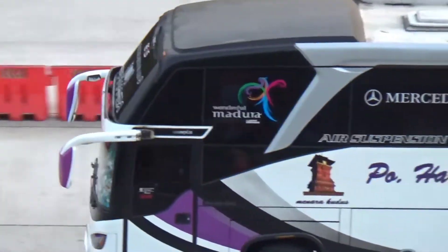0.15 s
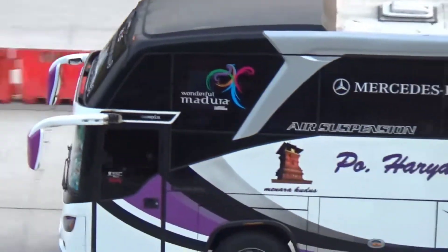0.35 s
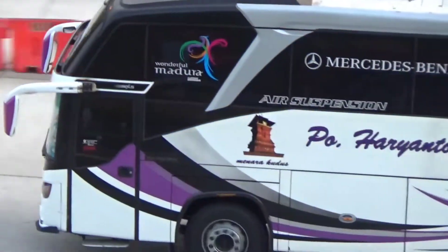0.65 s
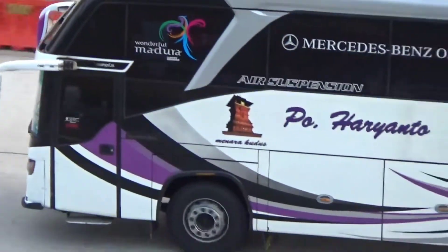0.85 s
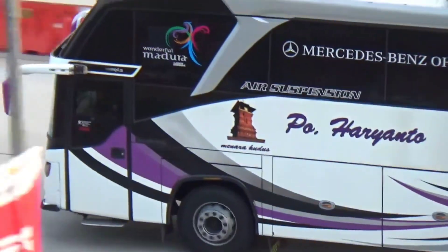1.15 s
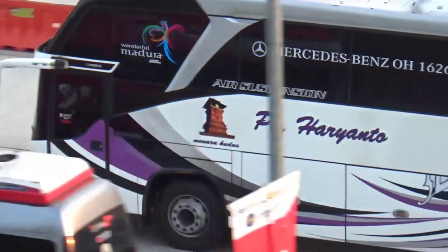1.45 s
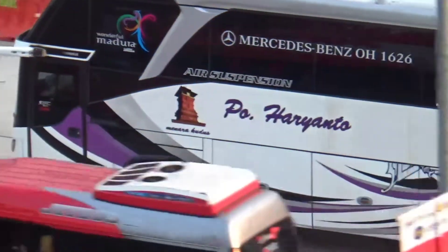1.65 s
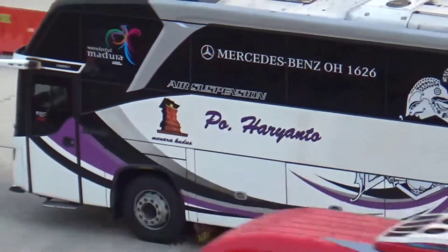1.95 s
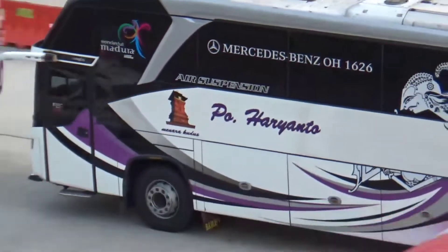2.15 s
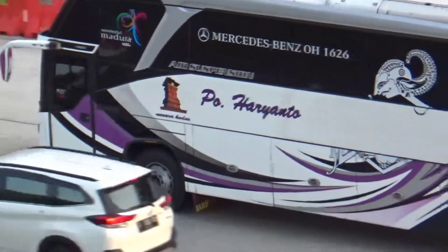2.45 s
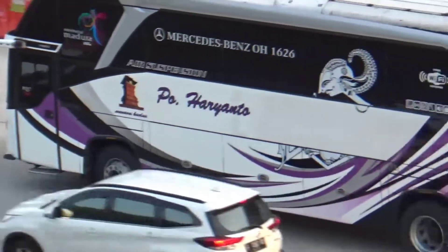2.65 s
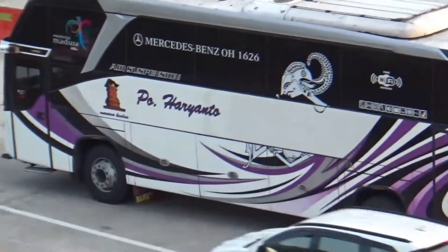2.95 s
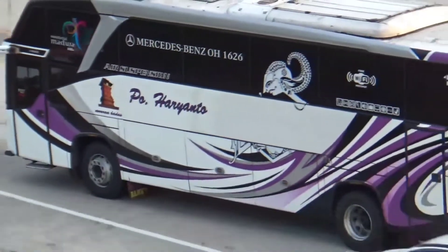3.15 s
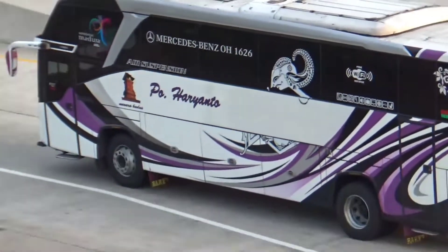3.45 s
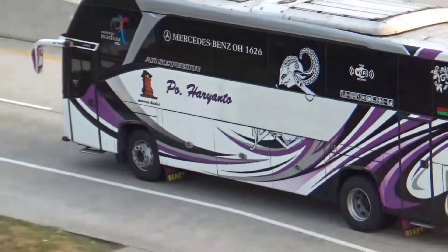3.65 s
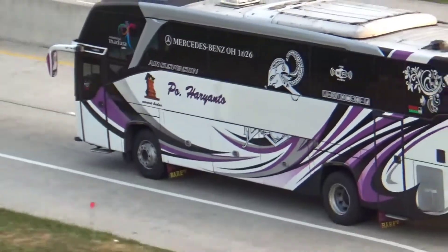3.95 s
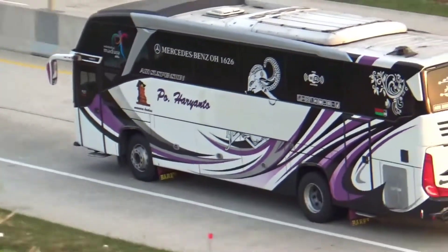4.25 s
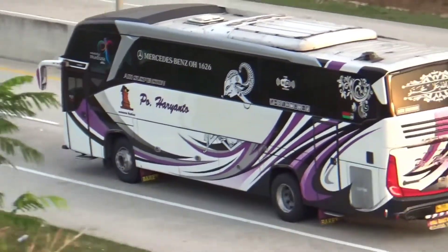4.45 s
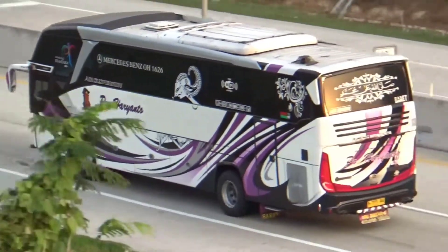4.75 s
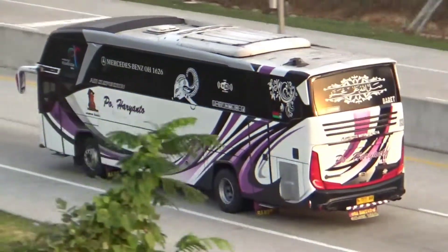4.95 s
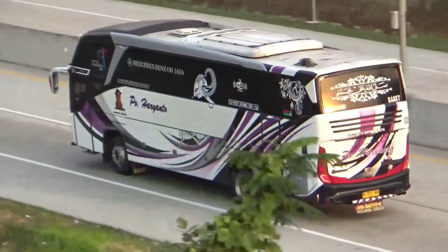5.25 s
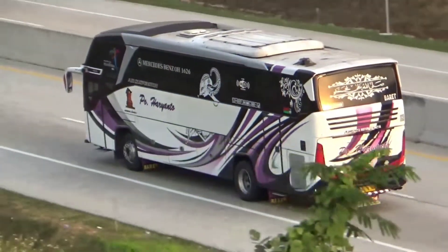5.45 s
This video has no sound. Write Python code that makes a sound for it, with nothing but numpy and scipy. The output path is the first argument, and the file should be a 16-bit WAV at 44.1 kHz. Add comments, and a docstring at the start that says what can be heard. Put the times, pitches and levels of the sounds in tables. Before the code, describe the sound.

From a raised spot beside a highway, steady traffic noise surrounds a passing coach. A hollow tyre howl and fluttering hiss build first, the hiss ducking for a moment as a car blocks the sound. As the coach moves away, its tyres whine and whistle and its rear engine adds a rushing noise. A faraway engine rises softly in pitch while the low rumble eases.

```python
"""A coach passing on a concrete highway

Heard from above the roadside through a close pair of microphones, the tyres howl and whine in the air
resonances of their tread and hiss with an echo off the road. The rush of the rear engine bay opens up
as the tail comes into view. Traffic rumbles around the coach, and a distant engine speeds up."""
import sys
import numpy as np
from scipy.fft import rfft, irfft
from scipy.io import wavfile
from scipy.ndimage import uniform_filter1d, minimum_filter1d, map_coordinates

SR = 44100
rng = np.random.default_rng(int(sys.argv[2]) if len(sys.argv) > 2 else 0)


def file_out(sig):
    """Save sig as 16-bit WAV at sys.argv[1]."""
    # one column per channel
    cols = np.atleast_2d(sig).T
    # limit, then scale
    lim = np.clip(cols, -1, 1)
    pcm = np.round(lim * 32767).astype(np.int16)
    wavfile.write(sys.argv[1], SR, pcm)


N = 246519
FFT_SIZE = 2 ** 18

# Air resonances of the tread: (frequency [Hz], bandwidth [Hz], relative level [dB])
HOWL_MODES = [(978.5, 122, 1), (1087, 200, -6), (1236, 130, -13)]
WHINE_MODES = [(1679, 163, -8), (1823, 203, 0), (2013, 267, -4.5)]
WHISTLE_MODES = [(2857, 360, -0.5), (3138, 690, -7.5)]
HORN_MODES = [(2634, 490, 0)]  # beamed fore and aft by the wedge between tyre and road
REARWARD_MODES = [(3690, 770, 9), (4290, 450, 5), (5090, 300, -12)]
SIZZLE_MODES = [(9150, 1100, 5.5), (10070, 1000, -4), (10500, 580, -6)]  # the top of the hiss
# Envelopes; the howl leads the approach, the whine the departure: (time [s], relative level [dB])
HOWL_ENVELOPE = [(0, -23.5), (.33, -27.5), (.85, -18), (1.1, -18), (1.26, -14), (1.6, -14.5), (2.0, -13),
                 (2.48, -20.5), (2.75, -19), (3.62, -17.5), (3.8, -25), (4.38, -26.5), (4.55, -23.5),
                 (4.8, -26), (5.59, -23.5)]
WHINE_ENVELOPE = [(0, -31.5), (1.3, -27.5), (1.6, -23.5), (1.71, -17), (1.85, -21.5), (2.35, -20.5),
                  (2.5, -26), (2.72, -22), (2.85, -14), (3.09, -18), (3.16, -15.5), (3.329, -16.5),
                  (3.48, -23.5), (3.8, -13), (4.4, -14), (4.63, -19.5), (4.75, -12), (5.59, -18)]
WHISTLE_ENVELOPE = [(0, -36), (.4, -39), (.8, -28.5), (1.2, -30), (1.8, -24), (2.37, -24), (2.5, -41.5),
                    (2.83, -17.5), (3.0, -23.5), (3.27, -15.5), (3.47, -23.5), (3.65, -18), (4.05, -35.5),
                    (4.62, -21), (5.05, -27.5), (5.4, -23.5), (5.59, -35)]
# Hum of the tread: (time [s], frequency [Hz], level [dB])
TREAD_HUM = [(0, 364, -47), (1.4, 371.6, -40), (2.6, 368.2, -45), (4.0, 331.6, -48), (5.59, 326.4, -61)]
# Surges and sags of the hiss, likely from the concrete's grain: (time [s], half-width [s], gain [dB])
HISS_SURGES = [(0.834, 0.044, 6), (1.19, 0.073, 3.5), (1.378, 0.05, 5), (1.543, 0.078, 3.5),
               (2.067, 0.053, 4.5), (2.852, 0.044, 3.5), (3.306, 0.038, 4), (3.4, .05, -4.5),
               (3.88, 0.16, 2.5), (4.195, 0.06, -2.5), (4.348, 0.029, 4), (5.25, 0.061, -2)]
# Rush of the engine bay before screening: (time [s], level [dB])
RUSH_ENVELOPE = [(0, -47), (1.2, -32), (2.4, -34.5), (2.78, -27), (3.42, -37), (3.72, -21), (3.93, -25),
                 (4.12, -21), (4.7, -30.5), (5.59, -23)]
# Spectra of tyre hiss, traffic rumble and traffic roar: (frequency [Hz], relative level [dB])
HISS_SPECTRUM = [(800, -37), (2300, -4.5), (3000, -9.5), (3800, 2.5), (4700, 0.5), (5500, 2), (6200, -0.5),
                 (6750, 0.5), (7120, 0.5), (7500, 2.5), (8500, 3.5), (9300, 1), (10200, -1.5),
                 (11000, -7.5)]
RUMBLE_SPECTRUM = [(15, -34), (55, -32), (85, -17.5), (130, -17.5), (190, -12.5), (260, -3), (340, 1),
                   (450, 2), (600, -8), (900, -5), (2000, -45)]
ROAR_SPECTRUM = [(200, -33.5), (480, -13), (620, -6.5), (720, 1.5), (900, 3), (1200, 0.5), (1450, -2.5),
                 (1900, -1), (2400, -14.5), (4000, -15.5), (11000, -29.5)]
# Scattering by barriers and vehicles: (frequency [Hz], level relative to the direct sound [dB])
SCATTER_SPECTRUM = [(30, -10), (100, -13), (300, -13.5), (1000, -15.5), (2000, -17), (4000, -13.5),
                    (7000, -11), (10500, -21)]
# Phase at the left microphone relative to the right: (frequency [Hz], phase [rad])
MICROPHONE_PHASE = [(20, 0), (150, -0.42), (300, -0.59), (520, -0.88), (1000, -0.89), (1300, -1.14),
                    (1750, -0.51), (2150, -0.93), (2500, -0.23), (3300, -0.53), (4800, -0.41), (6300, -0.4),
                    (8200, -0.41), (11000, -0.15)]

# Directivity: level on axis, bearing of the axis, width, greatest loss off axis
HISS_BEAM = dict(db=-21.5, aim_deg=21.5, width_deg=62.6, loss_db=6.5)
SIZZLE_BEAM = dict(db=-32, aim_deg=-2, width_deg=57, loss_db=8)
HORN_BEAM = dict(db=-24, aim_deg=36.7, width_deg=15.4, loss_db=8)
REARWARD_BEAM = dict(db=-27, aim_deg=32.8, width_deg=30.6, loss_db=15.5)
ENGINE_BEAM = dict(db=-31.5, aim_deg=46.4, width_deg=35, loss_db=19)

SPEED_M_PER_S, DISTANCE_M, ABREAST_S, SOUND_M_PER_S = 10.2, 20.4, 3.0, 343
# A car in the near lane briefly casts an acoustic shadow.
SHADOW_S, SHADOW_HALF_S = 2.548, 0.13
SHADOW_HISS_DB, SHADOW_SIZZLE_DB, SHADOW_RESONANCE_DB = 8, 14, 3.5


def coach():
    """A source in uniform straight motion: its bearing sets the Doppler shift of its resonances."""
    along_road_m = SPEED_M_PER_S * (seconds() - ABREAST_S)
    bearing = np.degrees(np.arctan(along_road_m / DISTANCE_M))  # negative on approach, 0 abreast
    doppler = 1 / (1 + SPEED_M_PER_S / SOUND_M_PER_S * np.sin(np.radians(bearing)))
    shadow = bell(seconds(), SHADOW_S, SHADOW_HALF_S)
    hum = drone(*over_time(TREAD_HUM), waver=0.00813, overtone_db=-12)
    sources = (tread_resonances, air_pumping, engine_bay)
    return hum + sum(source(bearing, doppler, shadow) for source in sources)


def tread_resonances(bearing, doppler, shadow):
    """Cavity resonance: the tread howls, whines and whistles; the horn effect beams one mode."""
    (howl_db,), (whine_db,), (whistle_db,) = map(over_time, (HOWL_ENVELOPE, WHINE_ENVELOPE,
                                                             WHISTLE_ENVELOPE))
    howl = from_db(howl_db + 1.13) * grooves(HOWL_MODES, doppler, flutter_db=0.33)
    whine = from_db(whine_db - 0.25) * grooves(WHINE_MODES, doppler, flutter_db=1.05)
    whistle = from_db(whistle_db - 1.5) * grooves(WHISTLE_MODES, doppler, flutter_db=1.75)
    horn = from_db(beam_db(np.abs(bearing), **HORN_BEAM)) * grooves(HORN_MODES, doppler, flutter_db=1.5)
    rear = from_db(beam_db(bearing, **REARWARD_BEAM)) * grooves(REARWARD_MODES, doppler, flutter_db=2.5)
    return howl + whine + whistle + (horn + rear) * from_db(-SHADOW_RESONANCE_DB * shadow)


def grooves(modes, doppler, flutter_db):
    """Superposition of modes: air rings in the tread grooves, fluttering with the road surface."""
    ringing = sum(from_db(db) * resonance(hz * doppler, width) for hz, width, db in modes)
    return unit_rms(ringing) * from_db(flutter_db * drift(rate_hz=12.4))


def air_pumping(bearing, doppler, shadow):
    """Air pumping: air squeezed from the tread makes a hiss and a sizzling top that surge together."""
    surge_db = sum(db * bell(seconds(), at_s, half_s) for at_s, half_s, db in HISS_SURGES)
    hiss_db = beam_db(bearing, **HISS_BEAM) + surge_db - SHADOW_HISS_DB * shadow
    sizzle_db = beam_db(bearing, **SIZZLE_BEAM) + 1.3 * surge_db - SHADOW_SIZZLE_DB * shadow
    hiss = hiss_with_echo(comb_hz=886 - 0.99 * bearing)  # the echo lags more as the coach moves on
    sizzle = grooves(SIZZLE_MODES, doppler, flutter_db=4.0)
    return from_db(hiss_db) * hiss + from_db(sizzle_db) * sizzle


def hiss_with_echo(comb_hz, reflection=0.39, scatter_above_hz=8000, flutter_db=1.23):
    """Interference with the road echo forms a comb filter; rough concrete scatters the echo's top."""
    direct = noise(from_db(over_frequency(HISS_SPECTRUM)))
    delayed = map_coordinates(direct, [np.arange(N) - SR / comb_hz], order=3)
    echo = filtered(delayed, 1 / (1 + (bin_hz() / scatter_above_hz) ** 8))
    return unit_rms(direct + reflection * echo) * from_db(flutter_db * drift(rate_hz=18))


def engine_bay(bearing, doppler, shadow, side_hz=3370, tail_hz=2274, in_view_s=3.99, turn_s=0.073):
    """Directional radiation: the engine roars rearwards; its rush deepens as the tail comes into view."""
    rush_db, = over_time(RUSH_ENVELOPE)
    tail_in_view = (1 + np.tanh((seconds() - in_view_s) / turn_s)) / 2
    centre_hz = side_hz + (tail_hz - side_hz) * tail_in_view
    rush = from_db(rush_db - SHADOW_RESONANCE_DB * shadow) * resonance(centre_hz, width_hz=1250)
    roar = from_db(beam_db(bearing, **ENGINE_BEAM)) * resonance(650 * doppler, width_hz=400)
    return rush + roar


def traffic(ebb_from_s=2.87, rumble_ebb_db_per_s=2.5, roar_ebb_db_per_s=0.4):
    """Incoherent sources merge into broadband rumble and roar, which ebb as one engine speeds up."""
    ebbing_s = np.maximum(seconds() - ebb_from_s, 0)
    rumble_db = -33 - rumble_ebb_db_per_s * ebbing_s
    roar_db = -23.5 - roar_ebb_db_per_s * ebbing_s
    rumble = from_db(rumble_db) * noise(from_db(over_frequency(RUMBLE_SPECTRUM)))
    roar = from_db(roar_db) * noise(from_db(over_frequency(ROAR_SPECTRUM)))
    return rumble + roar + distant_engine()


def distant_engine(start_s=3.85, attack_s=0.091, start_hz=188, rise_hz_per_s=68, fade_db_per_s=3):
    """Pitch follows engine speed: even acceleration gives a linear glide, which slowly fades."""
    since_s = seconds() - start_s
    running_s = np.maximum(since_s, 0)
    hz = start_hz + rise_hz_per_s * running_s
    tone = drone(hz, db=-47 - fade_db_per_s * running_s, waver=0.0055, overtone_db=-2)
    return np.clip(1 + since_s / attack_s, 0, 1) * tone


def beam_db(bearing, db, aim_deg, width_deg, loss_db):
    """Spherical spreading and directivity: level falls with distance and away from the beam's axis."""
    spreading_db = 20 * np.log10(np.cos(np.radians(bearing)))
    off_axis_db = loss_db * (1 - bell(bearing, aim_deg, width_deg))
    return db + spreading_db - off_axis_db


def resonance(centre_hz, width_hz):
    """A resonator driven by turbulence: amplitude and phase wander at a rate set by its bandwidth."""
    offset = bin_hz() / width_hz
    skirt = 1 / np.sqrt((1 + (2 * offset) ** 2) ** 2 * (1 + offset ** 4))
    phase = running_phase(centre_hz)
    return unit_rms(noise(skirt) * np.cos(phase) + noise(skirt) * np.sin(phase))


def drone(hz, db, waver, overtone_db):
    """A fundamental and its octave under random frequency and amplitude modulation."""
    phase = running_phase(hz * (1 + waver * drift(rate_hz=9.6)))
    tone = np.sin(phase) + from_db(overtone_db) * np.sin(2 * phase)
    return from_db(db + 5.1 * drift(rate_hz=4.1)) * unit_rms(tone)


def noise(gain):
    """Gaussian noise of unit power, shaped by a gain per frequency."""
    real, imaginary = rng.standard_normal((2, len(gain)))
    return unit_rms(irfft((real + 1j * imaginary) * gain, FFT_SIZE)[:N])


def drift(rate_hz):
    """Low-pass noise: a slow random fluctuation of unit power."""
    return noise(1 / (1 + (bin_hz() / rate_hz) ** 2))


def filtered(x, gain):
    """Linear filtering as multiplication of the spectrum."""
    return irfft(rfft(x, FFT_SIZE) * gain, FFT_SIZE)[..., :N]


def running_phase(hz):
    """Phase as the time integral of frequency."""
    return 2 * np.pi * np.cumsum(hz) / SR


def over_time(rows):
    """Linear interpolation of each value column at every sample."""
    times, *columns = np.transpose(rows)
    return [np.interp(seconds(), times, column) for column in columns]


def over_frequency(rows):
    """Linear interpolation on a log-frequency axis."""
    hz, value = np.transpose(rows)
    return np.interp(np.log(bin_hz()), np.log(hz), value)


def bell(x, centre, width):
    """Gaussian curve of height 1."""
    return np.exp(-((x - centre) / width) ** 2)


def from_db(db):
    """Amplitude ratio of a level in decibels."""
    return 10 ** (np.asarray(db) / 20)


def unit_rms(x):
    """Normalisation to unit power."""
    return x / np.sqrt(np.mean(x ** 2) + 1e-20)


def seconds():
    """Time of each sample."""
    return np.arange(N) / SR


def bin_hz():
    """Frequency of each spectral bin, at least 1 Hz."""
    return np.maximum(np.fft.rfftfreq(FFT_SIZE, 1 / SR), 1)


def scene():
    """Superposition of direct sound, lagging on the left, and uncorrelated scatter in antiphase."""
    opposite = np.array([[1], [-1]])
    direct = filtered(coach() + traffic(), np.exp(0.5j * over_frequency(MICROPHONE_PHASE) * opposite))
    scattered = filtered(coach() + traffic(), from_db(over_frequency(SCATTER_SPECTRUM))) * opposite
    return (direct + scattered) * from_db([[-0.3], [0.3]])


def record(dry):
    """Peak limiting by a fast, smoothed gain, then band limiting by a steep low-pass filter."""
    ceiling, cutoff_hz = 0.92, 11050
    allowed_gain = ceiling / np.maximum(np.abs(dry).max(axis=0), ceiling)
    gain = uniform_filter1d(minimum_filter1d(allowed_gain, size=129), size=129)
    return filtered(dry * gain, 1 / np.sqrt(1 + (bin_hz() / cutoff_hz) ** 400))


dry = scene()
out = record(dry)
file_out(out)
```